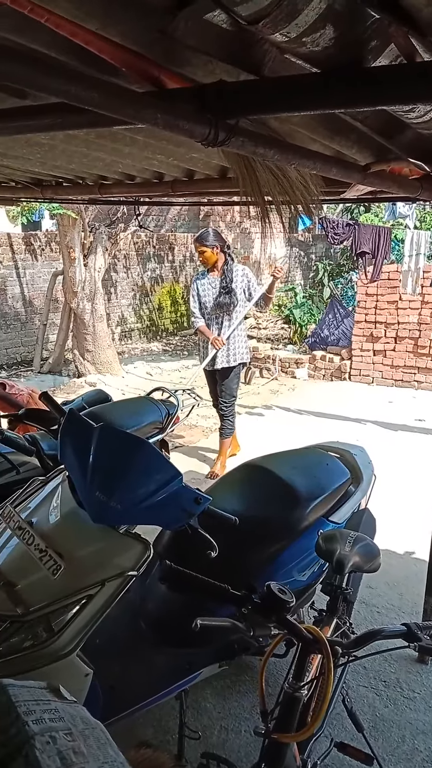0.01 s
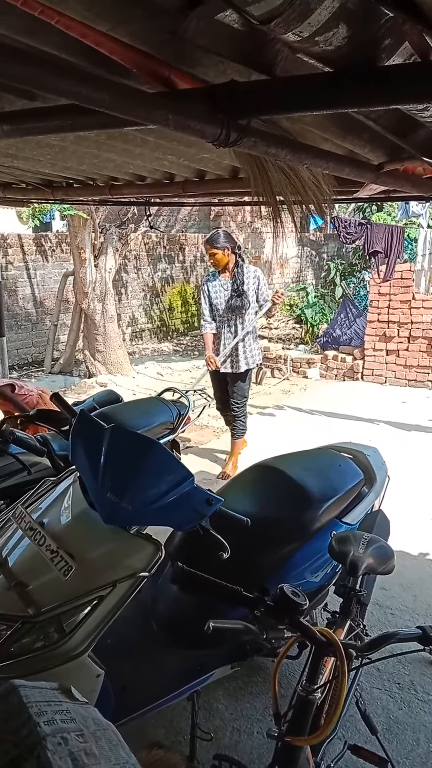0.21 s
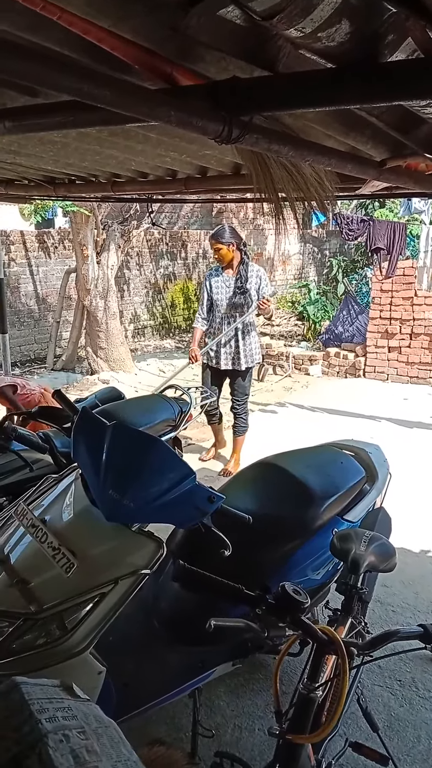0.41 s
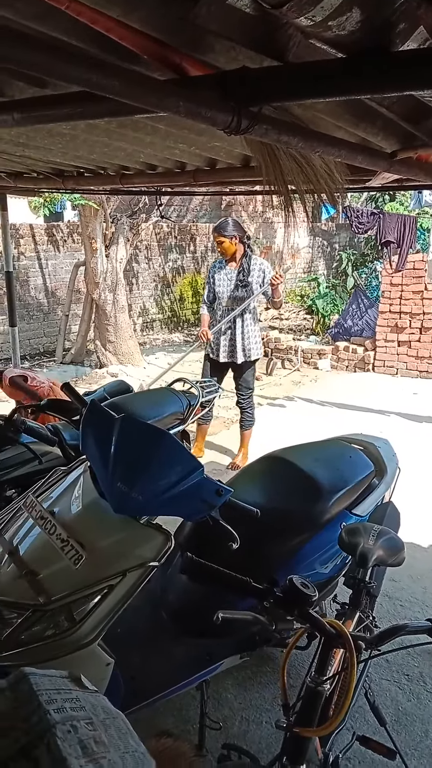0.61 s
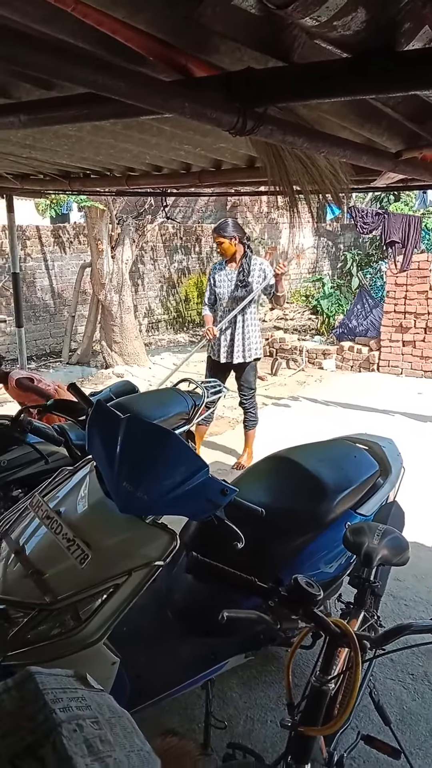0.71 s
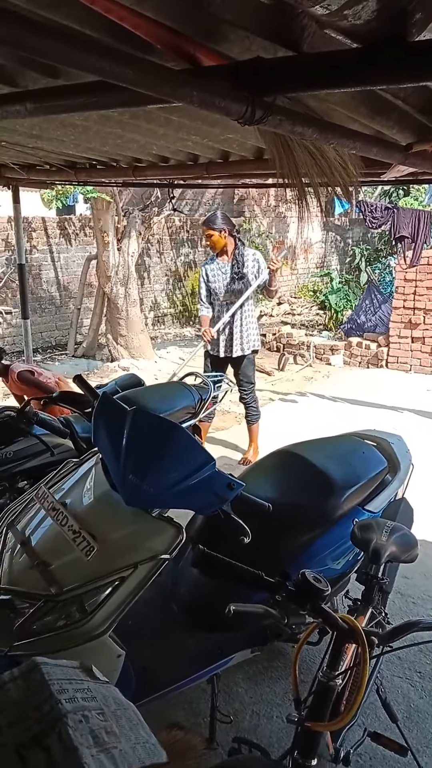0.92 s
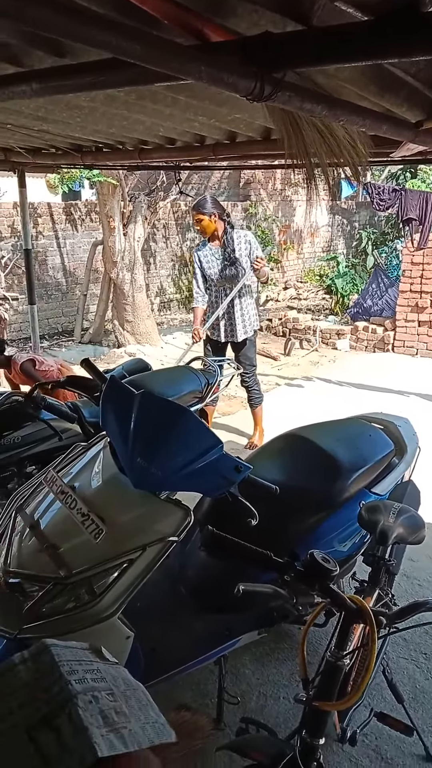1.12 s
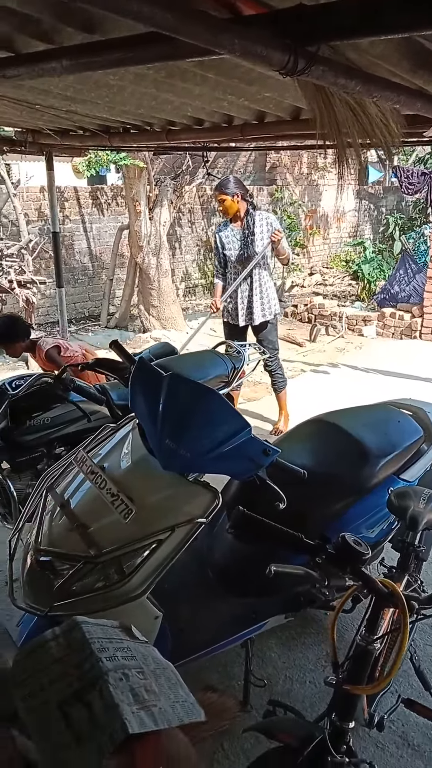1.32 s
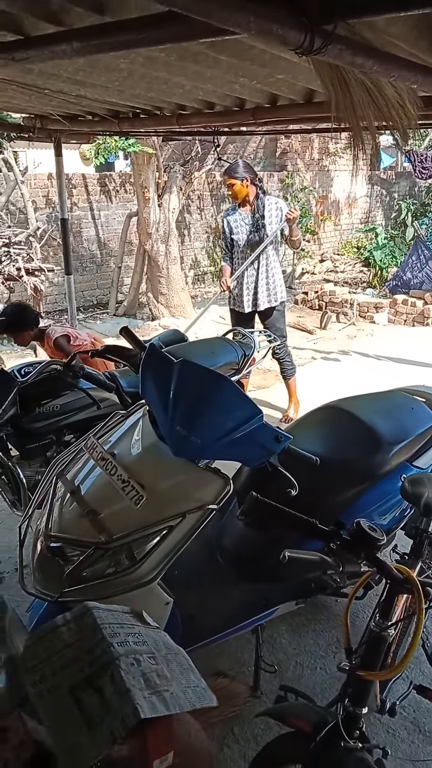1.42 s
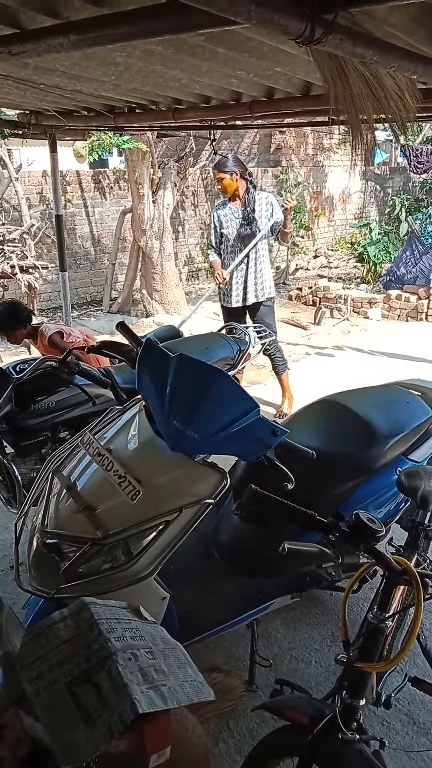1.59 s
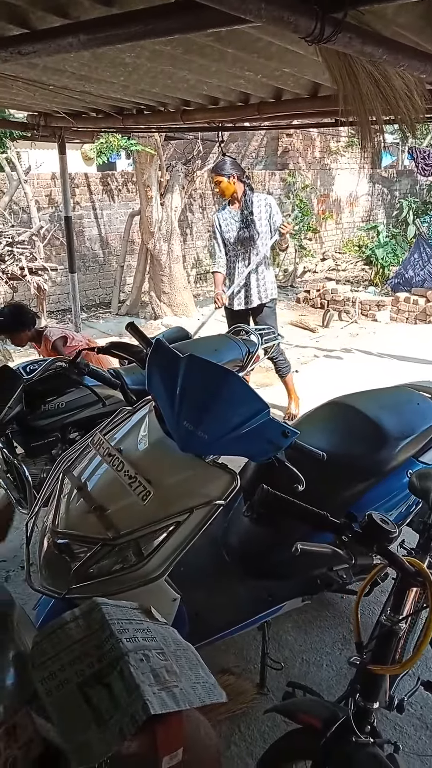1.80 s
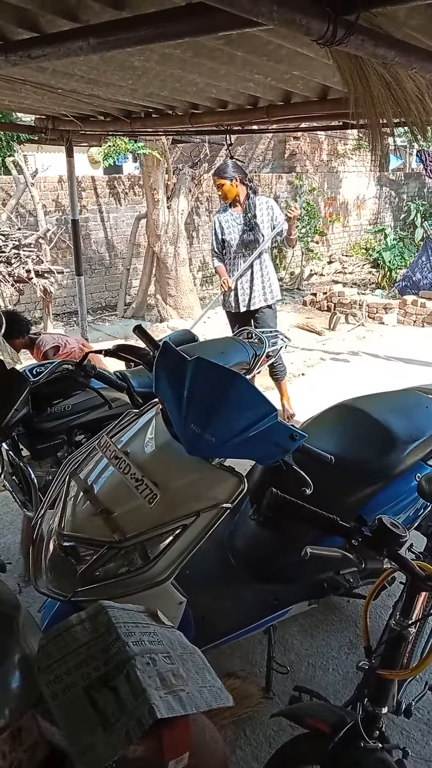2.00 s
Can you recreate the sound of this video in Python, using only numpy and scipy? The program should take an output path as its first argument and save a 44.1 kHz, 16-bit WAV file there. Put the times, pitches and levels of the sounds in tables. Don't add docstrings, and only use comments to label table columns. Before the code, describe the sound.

A stiff broom sweeps gritty paving. Near silence with a fading bird note opens; a long scratchy stroke swells from 0.1 s, peaks near 0.4 and fades by 0.7. A short stroke follows at 0.85, a long one at 1.1-1.55 with a hard knock at 1.37, a soft one at 1.65, and a last cut off. Falling whistles come around 0.3, 0.8, 1.2 and 1.7, hollow hoots every half second from 0.43, over faint distant engine thumping.

```python
import sys
import numpy as np
from scipy import signal
from scipy.fft import rfft, irfft
from scipy.io import wavfile
from scipy.ndimage import uniform_filter1d

SR = 44100
rng = np.random.default_rng(int(sys.argv[2]) if len(sys.argv) > 2 else 0)


def level_to_linear(level):
    exponent = np.asarray(level, float) / 20
    return 10 ** exponent


def master_out(mix):
    frames = np.transpose(np.atleast_2d(mix))
    ceiling = np.clip(frames, -1, 1)
    pcm = np.round(ceiling * 32767).astype(np.int16)
    wavfile.write(sys.argv[1], SR, pcm)


N = 88200

# pitch_hz, density_db [dB per Hz]
YARD_COLOUR = [(250, -1.5), (600, -8.5), (1000, -8.5), (1500, 1.5), (2300, -18), (4400, -20), (5300, -13.5),
               (7300, -15)]
# pitch_hz, density_db [dB per Hz]
HISS_COLOUR = [(7600, 1), (10500, -6.5), (10800, -23.5), (12000, -10), (15400, -24)]
# time_s, level_db
ENGINE_LEVEL = [(0.0, -92), (0.28, -71.5), (0.33, -51.5), (0.41, -60), (0.47, -53), (0.48, -61),
                (0.77, -64.5), (1.01, -56.5), (1.08, -69.5), (1.14, -56), (1.33, -69.5), (1.39, -47.5),
                (1.48, -58), (1.65, -57.5), (1.75, -75.5), (1.8, -61.5), (1.97, -54), (2.0, -62)]
# time_s, thumps_so_far [count]
ENGINE_FIRING = [(0, .3), (.335, 7), (.585, 12), (.828, 17), (1.04, 22), (1.145, 24), (1.395, 29),
                 (1.44, 30), (1.61, 33), (1.82, 37), (2, 40.9)]
# pitch_hz, density_db [dB per Hz]
THUMP_COLOUR = [(15, -74), (25, -21), (43, -20.5), (102, 0.5), (124, 1.5), (171, -5), (232, -27),
                (320, -30), (420, -29.5), (700, -120)]
# start_s, level_db
HOOTS = [
    (.425, -54.5),
    (.965, -59.5),
    (1.49, -54.5),
    (1.99, -55.5),
]
# share_of_call [0-1], pitch_hz
FALL_PATH = [(0, 3763), (.55, 3520), (.63, 3284), (.76, 2997), (.87, 2716), (1, 2580)]
# start_s, length_s, start_db, peak_db, pitch_factor [ratio]
WHISTLES = [
    (0.284, 0.11, -61, -44, 1.0),
    (0.812, .13, -69.5, -51.5, 0.97),
    (1.215, .125, -69, -45.5, 0.99),
    (1.709, .072, -64.5, -46.5, 1.0),
]
# start_s, length_s, level_db, from_hz, to_hz
LEAD_NOTES = [
    (-.04, .055, -74, 2500, 2480),
    (-.04, .05, -77, 3000, 3000),
    (-.04, .055, -74, 3400, 3400),
    (.715, .045, -86, 3800, 3800),
    (.752, .055, -70, 4050, 4060),
    (1.166, .045, -51, 4030, 4020),
    (1.663, .05, -54, 3950, 3850),
]
# start_s, length_s, level_db, from_hz, to_hz
CHEEPS = [
    (.63, .12, -85, 6400, 6330),
    (.838, .022, -57, 5900, 5900),
    (.972, .03, -73, 5250, 5250),
    (1.055, .04, -72, 2300, 2350),
    (1.69, .085, -67, 5300, 5850),
    (1.74, .06, -75, 6550, 6900),
]
# time_s, tip_level_db, extra_grit_drag_db
STROKES = [
    [(0.1, -91, -9), (0.142, -55.5, -13), (0.158, -48.5, 0.5), (0.392, -29, -0.5), (0.502, -37.5, 3),
     (0.61, -58, 1.5), (0.662, -61.5, -6.5), (0.72, -93, -10)],
    [(0.81, -69, 8), (0.82, -82, -3), (0.842, -49, -11.5), (0.892, -52.5, -4), (0.914, -44, -8.5),
     (0.94, -46.5, -3), (0.988, -69, 3.5), (1.01, -97, 4)],
    [(1.05, -75, -11), (1.08, -56, 0.5), (1.13, -46.5, 3.5), (1.166, -48.5, 2.5), (1.268, -31, -0.5),
     (1.334, -37, 2.5), (1.428, -36.5, 2.5), (1.56, -55, 4)],
    [(1.56, -69, -2), (1.566, -56.5, -6), (1.666, -45, -3.5), (1.724, -68, 4), (1.732, -75, 7),
     (1.75, -76, 15)],
    [(1.8, -71, 1), (1.852, -47, -4), (1.87, -45, 2), (1.942, -49, 2.5), (2.0, -44, -1)],
]
# pitch_hz, density_db [dB per Hz]
TIP_COLOUR = [(4000, -12), (4500, -8), (4800, -0.5), (5500, 1), (7400, -4), (9400, -13.5), (11300, -14),
              (15300, -5.5)]
# pitch_hz, density_db [dB per Hz]
GRIT_COLOUR = [(800, -27.5), (1000, -10), (1650, -1), (1950, -8), (2450, -11), (3000, -7), (3400, 1.5),
               (3950, -12.5)]
# pitch_hz, density_db [dB per Hz]
RUB_COLOUR = [(200, -3), (300, -5.5), (420, -3), (550, -3.5), (800, -10)]
# start_s, level_db
TAPS = [
    (0.846, -53),
    (1.367, -36),
    (1.1, -58),
]
# start_s, length_s, level_db, pitch_hz
HANDLE_HUM = [
    (1.21, 0.117, -61.5, 413),
    (1.3, 0.085, -68.5, 430),
    (.4, .1, -74.5, 400),
    (1.22, 0.095, -66, 630),
    (1.2, 0.334, -72.5, 225),
]


def evened(x):
    return x / np.sqrt(np.mean(x ** 2) + 1e-20)


def curve(rows, col, off):
    rows = np.array(rows)
    return np.interp(np.arange(N) / SR, rows[:, 0], rows[:, col], off, off)


def colour(x, points, slope_db):
    hz = np.fft.rfftfreq(len(x), 1 / SR) + 1
    f, db = np.transpose(points)
    beyond = np.maximum(np.log2(f[0] / hz), 0) + np.maximum(np.log2(hz / f[-1]), 0)
    gain_db = np.interp(np.log(hz), np.log(f), db) - slope_db * beyond
    return evened(irfft(rfft(x) * level_to_linear(gain_db), len(x)))


def patchy(x, depth_db, bins, frames):
    t, z = signal.stft(x, SR, nperseg=512)[1:]
    field = uniform_filter1d(rng.standard_normal(z.shape), bins, 0)
    field = evened(uniform_filter1d(field, frames, 1))
    depth = np.interp(t, np.arange(N) / SR, depth_db * np.ones(N))
    patches = level_to_linear(depth * field - 0.12 * depth ** 2)
    return signal.istft(z * patches, nperseg=512)[1][:N]


def add(mix, start_s, sound):
    at = round(start_s * SR)
    sound = sound[max(-at, 0):]
    part = mix[max(at, 0):][:len(sound)]
    part += sound[:len(part)]


def slow_drift(length):
    noise = rng.standard_normal(16000)
    return evened(uniform_filter1d(uniform_filter1d(noise, size=200), size=200))[:length]


def tone(length_s, hz, edge_s, wobble, flutter_db):
    t = np.arange(0, length_s, 1 / SR)
    edges = np.clip(np.minimum(t, length_s - t) / edge_s, 0, 1)
    shape = np.sin(np.pi / 2 * edges) ** 2 * level_to_linear(flutter_db * slow_drift(len(t)))
    phase = 2 * np.pi * np.cumsum(hz * (1 + wobble * slow_drift(len(t)))) / SR
    return np.sqrt(2) * shape * np.sin(phase)


def tail(x, t60_s, gap_s):
    t = np.arange(SR // 2) / SR
    echoes = rng.standard_normal(len(t)) * level_to_linear(-60 * t / t60_s) * (t > gap_s)
    return signal.fftconvolve(x, echoes / np.linalg.norm(echoes))[:len(x)]


def air():
    yard = colour(rng.standard_normal(N), YARD_COLOUR, slope_db=40)
    yard = patchy(yard, depth_db=3.0, bins=3, frames=8)
    hiss = colour(rng.standard_normal(N), HISS_COLOUR, slope_db=140)
    hiss = patchy(hiss, depth_db=0.0, bins=8, frames=8)
    wake_s, asleep_db = 0.092, -10.5
    awake = level_to_linear(np.interp(np.arange(N) / SR, [wake_s, wake_s + 0.0068], [asleep_db, 0]))
    return level_to_linear(-80.5) * yard + level_to_linear(-77) * hiss * awake


def engine():
    count = curve(ENGINE_FIRING, 1, 0)
    strength = level_to_linear(1.4 * rng.standard_normal(60))
    pulses = np.diff(np.floor(count), prepend=0) * strength[count.astype(int)]
    thumps = colour(pulses, THUMP_COLOUR, slope_db=-2)
    rumble = colour(rng.standard_normal(N), THUMP_COLOUR, slope_db=37)
    return level_to_linear(curve(ENGINE_LEVEL, 1, -70)) * evened(thumps + level_to_linear(4) * rumble)


def hollow_bird():
    pitch_hz, length_s, echo_s, echo_db = 695.6, 0.1, 0.19, -18.5
    x = np.zeros(N)
    for start_s, level_db in HOOTS:
        note = level_to_linear(level_db) * tone(length_s, pitch_hz, edge_s=0.022, wobble=0.006, flutter_db=1.8)
        echo = note[:round(0.7 * len(note))]
        add(x, start_s, note)
        add(x, start_s + echo_s, level_to_linear(echo_db) * echo * np.hanning(len(echo)))
    return x + level_to_linear(-12) * tail(x, t60_s=0.21, gap_s=0.039)


def whistling_birds():
    lead = SR // 5
    x = np.zeros(N + lead)
    for start_s, length_s, start_db, peak_db, factor in WHISTLES:
        u = np.arange(0, length_s, 1 / SR) / length_s
        swell = level_to_linear(np.interp(u, [0, 0.6, 1], [start_db, peak_db, peak_db - 9]))
        hz = factor * np.interp(u, *np.transpose(FALL_PATH))
        call = swell * tone(length_s, hz, edge_s=0.007, wobble=0.01, flutter_db=3.5)
        add(x, start_s + lead / SR, call)
    for notes, wobble, flutter_db in (LEAD_NOTES, 0.004, 1.98), (CHEEPS, 0.018, 3.66):
        for start_s, length_s, level_db, from_hz, to_hz in notes:
            u = np.arange(0, length_s, 1 / SR) / length_s
            hz = from_hz + (to_hz - from_hz) * np.sqrt(u)
            call = level_to_linear(level_db) * tone(length_s, hz, 0.01, wobble, flutter_db)
            add(x, start_s + lead / SR, call)
    return (x + level_to_linear(1.5) * tail(x, t60_s=0.22, gap_s=0.0019))[lead:]


def scrape(points, streak_db):
    snaps_per_s, spread_db, snap_share = 7000, 1.6, 0.32
    strength = level_to_linear(spread_db * rng.exponential(1, N).clip(0, 4))
    snaps = rng.standard_normal(N) * strength * (rng.random(N) < snaps_per_s / SR)
    friction = rng.standard_normal(N)
    drive = np.sqrt(snap_share) * evened(snaps) + np.sqrt(1 - snap_share) * friction
    broad = patchy(colour(drive, points, slope_db=47), depth_db=0.4, bins=8, frames=5)
    return patchy(broad, streak_db, bins=3, frames=12)


def handle():
    x = np.zeros(N)
    t = np.arange(400) / SR
    for start_s, level_db in TAPS:
        add(x, start_s, level_to_linear(level_db - 60 * t / 0.0067) * np.diff(rng.standard_normal(401)))
    for start_s, length_s, level_db, hz in HANDLE_HUM:
        hum = tone(length_s, hz, edge_s=0.016, wobble=0.058, flutter_db=3.0)
        add(x, start_s, level_to_linear(level_db) * hum)
    return x


def broom():
    level = sum(level_to_linear(curve(stroke, 1, -120)) for stroke in STROKES)
    level = uniform_filter1d(level, size=200)
    drag_db = sum(curve(stroke, 2, 0) for stroke in STROKES)
    softness_db = np.clip(-39 - 20 * np.log10(level + 1e-9), 0, 40)
    streak_db = 1.5 + 0.1618 * softness_db
    tips = level * scrape(TIP_COLOUR, streak_db)
    grit_gain = level_to_linear(-7 + drag_db) * (level / level_to_linear(-38)) ** 0.01
    grit = level * grit_gain * scrape(GRIT_COLOUR, streak_db)
    rub = level_to_linear(-77.5) * (level / level_to_linear(-35)) ** 0.54 * scrape(RUB_COLOUR, streak_db)
    return tips + grit + rub + handle()


def scene():
    sweep = broom()
    walls = level_to_linear(-26) * tail(sweep, t60_s=0.44, gap_s=0.012)
    mono = air() + engine() + hollow_bird() + whistling_birds() + sweep + walls
    return np.array([mono, mono])


def top_cut(x):
    return signal.sosfilt(signal.butter(12, 16750, fs=SR, output="sos"), x)


def record(dry):
    low_pass = signal.firwin(511, 15560, window=("kaiser", 9), fs=SR)
    mix = signal.oaconvolve(dry, low_pass[None], "same")
    return top_cut(mix)


dry = scene()
out = record(dry)
master_out(out)
```